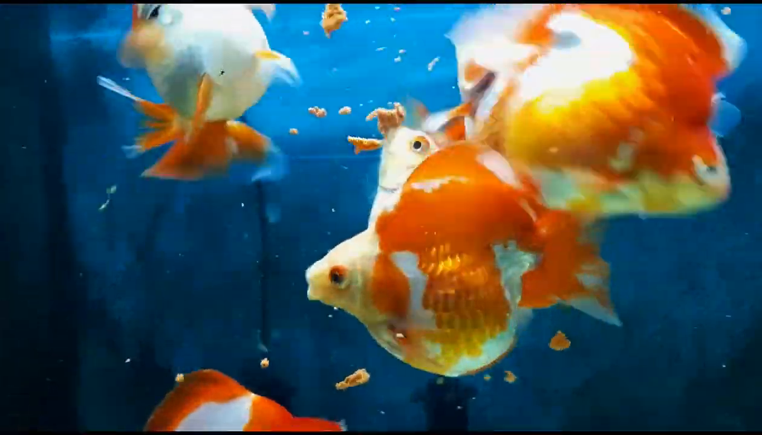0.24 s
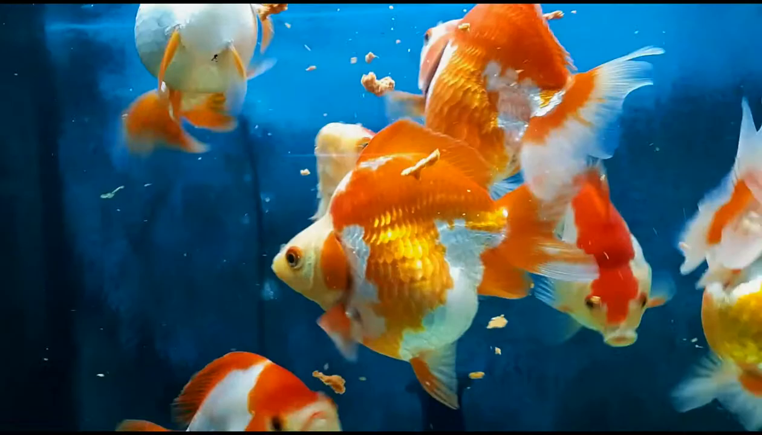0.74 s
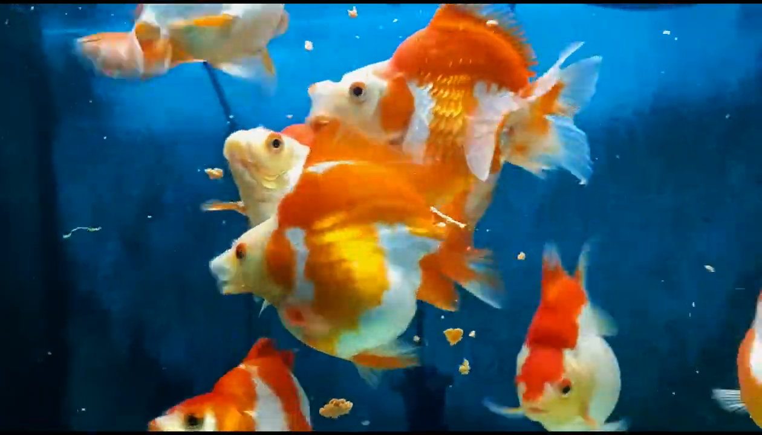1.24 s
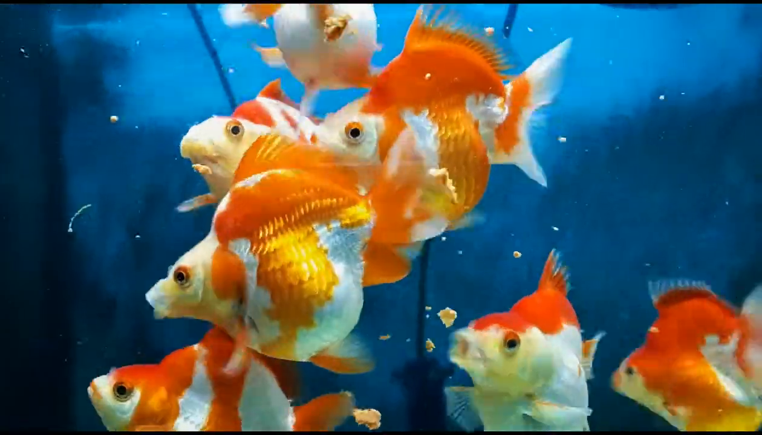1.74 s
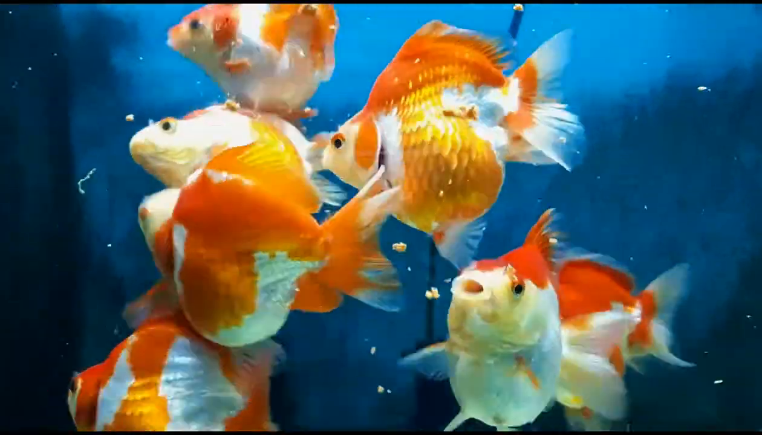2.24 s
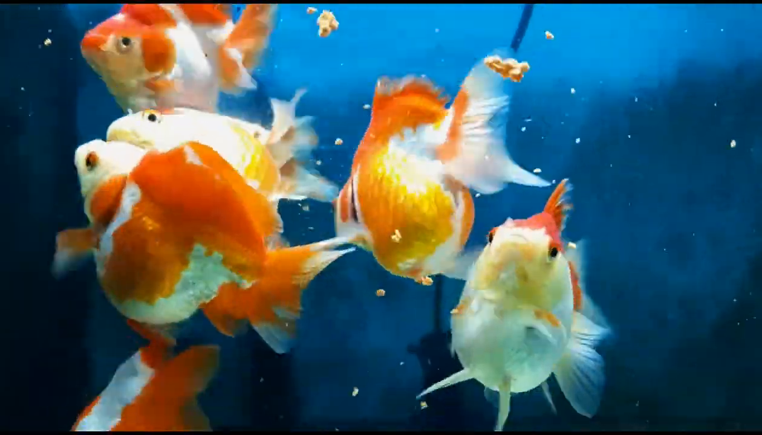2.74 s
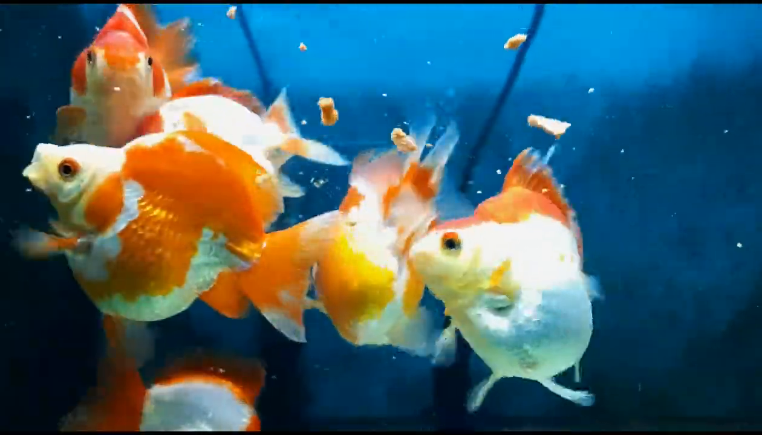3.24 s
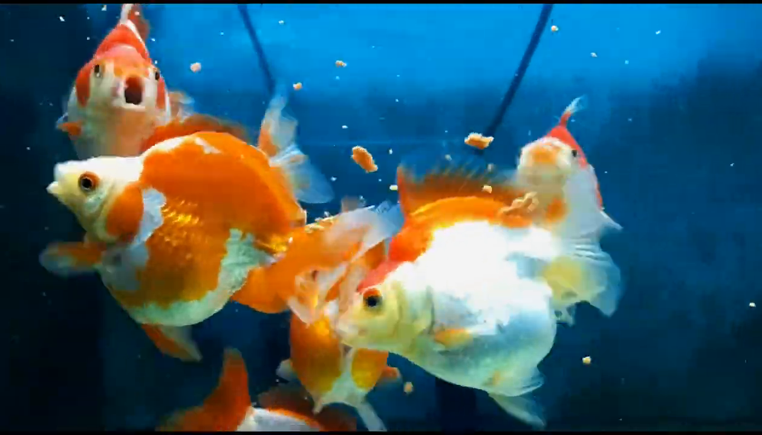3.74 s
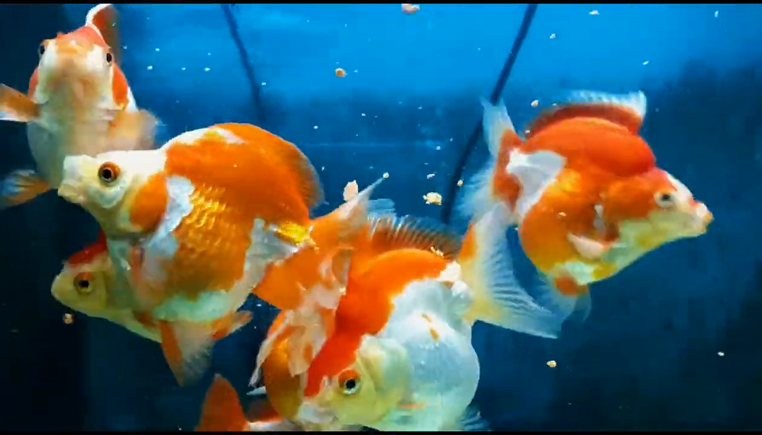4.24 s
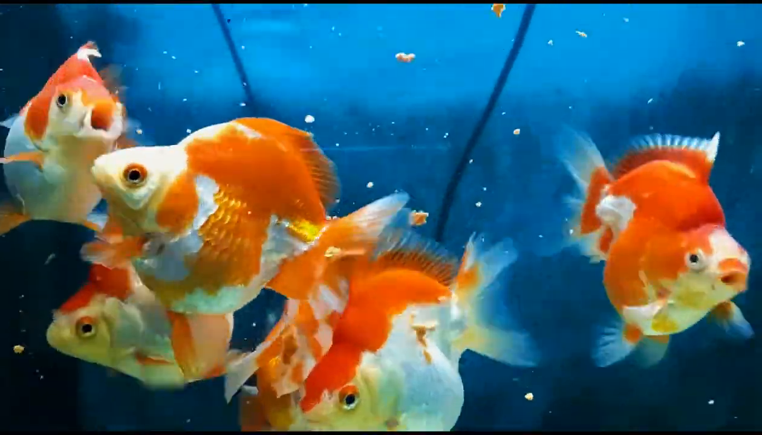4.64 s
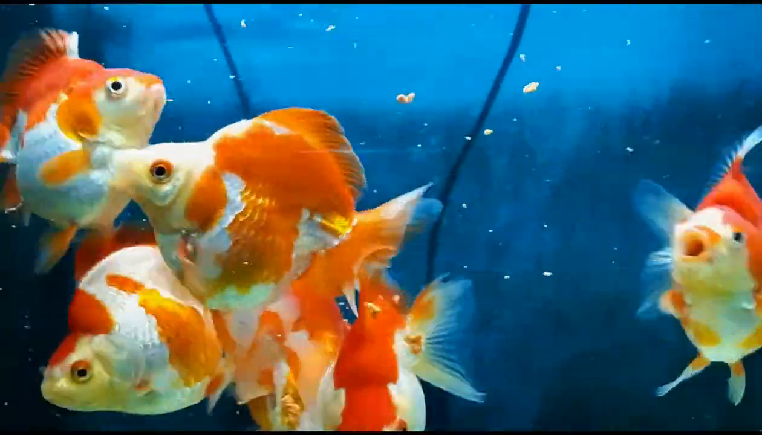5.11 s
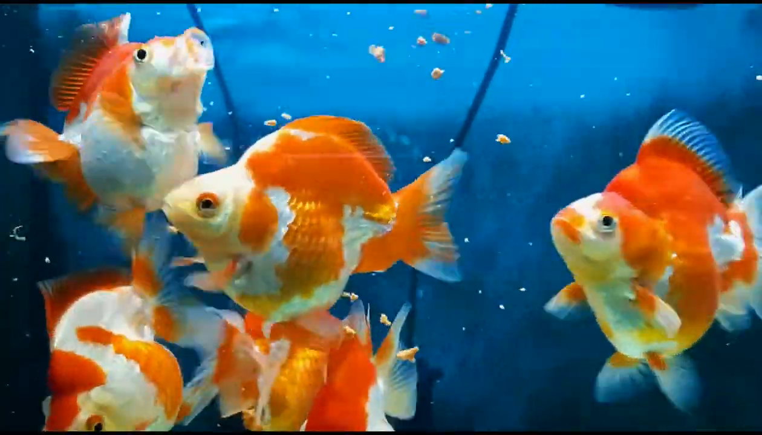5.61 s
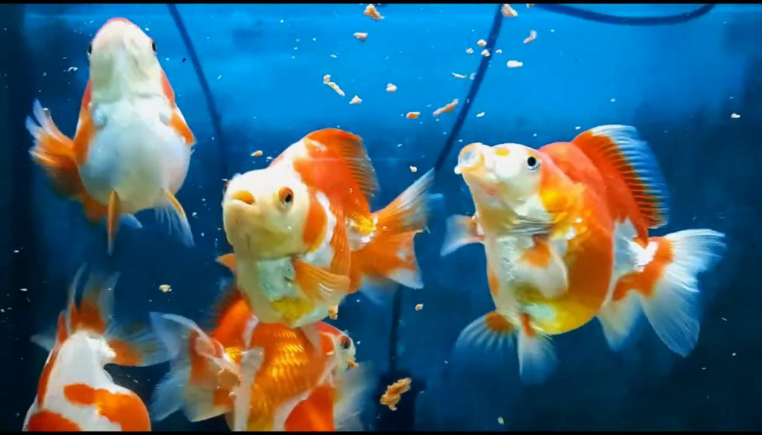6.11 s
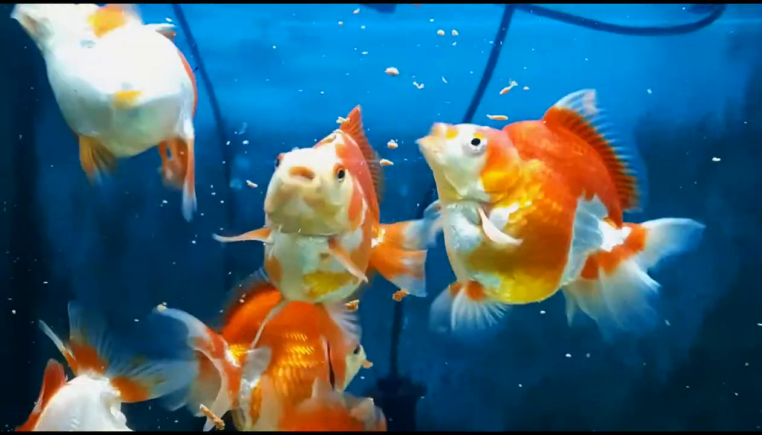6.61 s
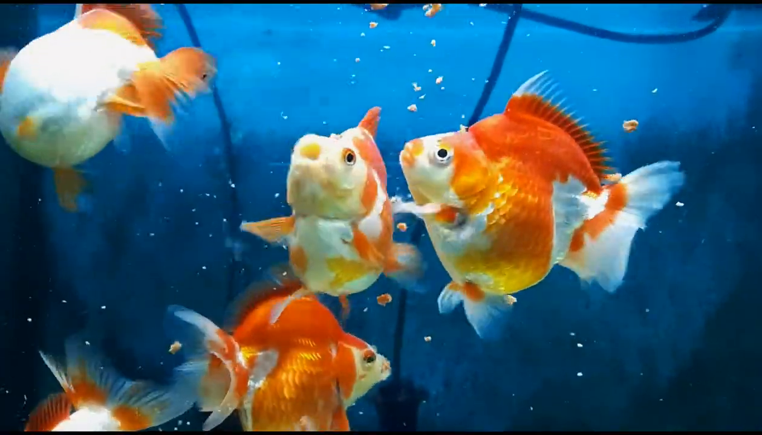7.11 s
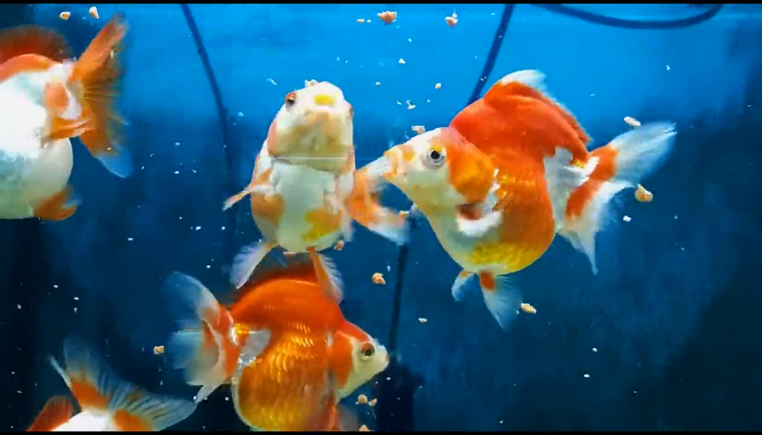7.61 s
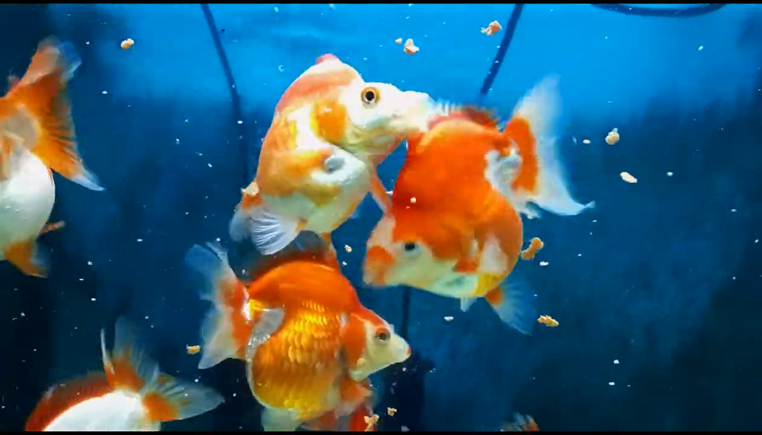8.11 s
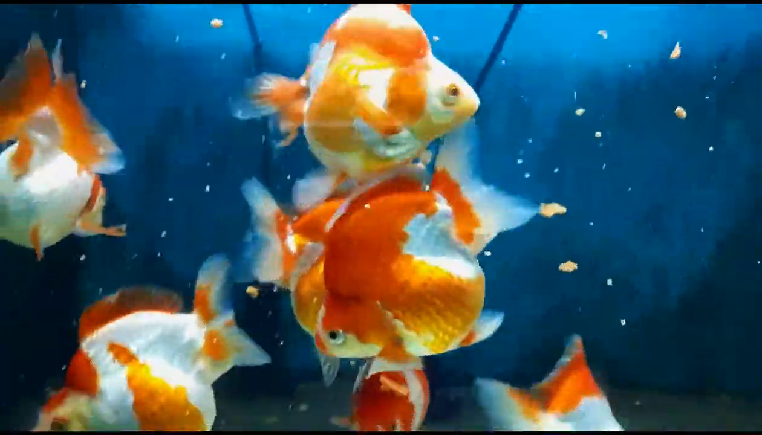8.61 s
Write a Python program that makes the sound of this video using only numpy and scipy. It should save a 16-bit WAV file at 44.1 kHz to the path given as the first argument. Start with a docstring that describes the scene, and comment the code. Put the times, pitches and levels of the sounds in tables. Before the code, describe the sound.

Indoors, close to a goldfish tank, an air pump buzzes low and steady while filter water washes and bubbles. Small bubbles ping, with a cluster of louder plops and light clicks just before the middle. Then a sudden, very loud hard knock clatters and rings briefly; the background drops for about a second and creeps back. Later comes a soft booming bump, then a splashy swish with plops near the end.

```python
"""An aquarium's air pump buzzes at mains frequency in a small room, as harmonics that waver.
The filter outflow is shaped noise that washes and flickers; chirping sines make its bubbles.
A sharp knock of something hard is bursts of noise and ringing modes; around it come a few
light clicks, and later a soft bump that booms. The knock makes the recorder's gain control
duck everything for about a second."""
import sys
import numpy as np
from scipy import signal
from scipy.fft import rfft, irfft, next_fast_len
from scipy.io import wavfile
from scipy.ndimage import uniform_filter1d, minimum_filter1d

SR = 44100
rng = np.random.default_rng(int(sys.argv[2]) if len(sys.argv) > 2 else 0)


def unload_audio(sound):
    """Save the sound as a 16-bit wav file, at the path given as the first command line argument."""
    columns = np.transpose(np.atleast_2d(sound))
    # keep every value between -1 and 1, then stretch to whole-number steps
    steps = np.round(np.clip(columns, -1, 1) * 32767)
    wavfile.write(sys.argv[1], SR, steps.astype(np.int16))


N = 390726
TIME = np.arange(N) / SR


def from_db(db):
    """Decibels to gain."""
    return 10 ** (np.asarray(db) / 20)


def rms_one(x):
    """Scale to rms 1."""
    return x / np.sqrt(np.mean(x ** 2) + 1e-20)


def bins(size):
    """Frequencies of a real spectrum in Hz, kept above zero."""
    return np.maximum(np.arange(size // 2 + 1) * SR / size, 1)


def at_hz(points, hz):
    """Read a table on a log-frequency axis."""
    table = np.array(points)
    return np.interp(np.log(hz), np.log(table[:, 0]), table[:, 1])


def drift(rate_hz, step_samples=64):
    """Slow chance with spread 1: noise on a coarse time grid, rolled off above rate_hz."""
    size = 2 * (N // step_samples // 2 + 2)
    rolloff = 1 + (bins(size) / step_samples / rate_hz) ** 2
    slow = irfft(rfft(rng.standard_normal(size)) / rolloff, size)
    return np.interp(np.arange(N) / step_samples, np.arange(size), rms_one(slow))


def room_noise(gain, size):
    """Diffuse noise of a given spectrum: much alike at both microphones in the bass, little in the treble."""
    # likeness of the two microphones; it swings where sound from one side meets them out of step
    # columns: frequency_hz, coherence [-1 to 1]
    likeness = [(50, 0.84), (120, 0.95), (270, 0.96), (450, 0.89), (720, 0.2), (1000, 0.086), (1250, 0.11),
                (1500, -0.33), (1850, -0.28), (2350, 0.26), (3300, -0.04), (15000, 0.0094)]
    alike = np.clip(at_hz(likeness, bins(size)), -.99, .99)
    mid, side = rfft(rng.standard_normal((2, size)))
    common = np.sqrt((1 + alike) / 2) * mid
    opposed = np.sqrt((1 - alike) / 2) * side * [[1], [-1]]
    return irfft(gain * (common + opposed), size)


def dying(t60_s):
    """One second of exponential decay, falling 60 dB in t60_s."""
    return np.exp(-np.log(1000) * TIME[:SR] / t60_s)


def swelling(rise_s):
    """One second of exponential approach to full level."""
    return 1 - np.exp(-TIME[:SR] / rise_s)


def add(out, start_s, sound):
    """Mix a sound in at a given time."""
    start = max(round(start_s * SR), 0)
    out[:, start:start + sound.shape[1]] += sound[:, :N - start]


def burst(level_db, centre_hz, octaves, rise_s=0.004, t60_s=0.21):
    """One resonance excited briefly: a band of noise that swells and dies away with the room."""
    distance = np.log2(bins(SR) / centre_hz) / octaves
    band = rms_one(room_noise(np.exp(-.5 * distance ** 2), SR))
    swell = dying(t60_s) * swelling(rise_s)
    return from_db(level_db) * band * swell / swell.max()


def pump(waver_db=0.4, mains_hz=60.022):
    """The diaphragm beats with the mains; changing back pressure makes each harmonic waver."""
    # pump harmonics in the room's standing waves, levels as rms before the waver
    # columns: multiple [of mains], left_db, right_db, left_lead_rad
    harmonics = [(1, -64, -66, -0.6), (2, -57.5, -58, 0), (3, -52.5, -51.5, -0.2), (4, -65, -63, 0),
                 (5, -55, -53, 0), (6, -61, -62, 0.5), (7, -43, -43, -0.4), (8, -57, -56, 0.3),
                 (9, -66, -71, 0.5), (10, -58, -50, 0.3), (11, -55, -46, 0.2), (13, -58, -51, 0.8),
                 (14, -66, -50, -0.5), (16, -67, -65, 2.6), (17, -62, -76, 3), (18, -66, -62, -1.9),
                 (19, -68, -67, 0.4), (21, -67, -61, 0.4), (22, -61, -63, 0.2), (23, -66, -66, -3),
                 (30, -66, -81, 3.1)]
    out = np.zeros((2, N))
    wavers = [from_db(waver_db * drift(1.9)) for _ in range(4)]  # shared among the harmonics
    for k, (multiple, left_db, right_db, lead_rad) in enumerate(harmonics):
        phase = 2 * np.pi * (multiple * mains_hz * TIME + rng.random())
        tone = np.sin([phase + lead_rad, phase])
        out += from_db([[left_db], [right_db]]) * tone * wavers[k % len(wavers)]
    return np.sqrt(2) * out  # sine peak from rms


def outflow(flow_db=-0.34, spray_db=-0.26, surge_db=0.5, spatter_db=1.34, spatter_hz=5940.0):
    """A wash of water, coloured by the tank's resonances; its spray grows and flickers with the flow."""
    # water wash, stirred by the outflow; columns: frequency_hz, density_db [per Hz, before flow_db]
    wash = [(48, -100), (70, -77), (88, -92.5), (125, -76.5), (220, -72), (340, -73), (530, -69.8),
            (640, -75), (730, -71.5), (900, -74), (2400, -77), (3000, -84.5), (3700, -90.5), (6800, -91),
            (7700, -96.5), (11500, -96.5), (15000, -99.4)]
    # resonances of tank and cabinet that the flow keeps ringing
    # columns: centre_hz, width_hz, level_db [rms, before flow_db]
    resonances = [(73, 2.5, -69.5), (109.7, 7, -67), (156.6, 3.4, -58.5), (278, 19, -55.5),
                  (391.4, 9, -52.5), (415, 32, -53.5), (722, 47, -54.5), (1320, 18, -60), (1776, 40, -57),
                  (2340, 27, -59)]
    # where the wash sits between the microphones; columns: frequency_hz, left_minus_right_db
    balance = [(200, -1), (430, -3.5), (650, -4.5), (900, 0), (1250, -0.6), (1800, 4.5), (2500, 1),
               (3200, -1.8), (12000, -0.5), (15000, -4)]
    size = next_fast_len(N)
    hz = bins(size)
    power = from_db(at_hz(wash, hz)) ** 2
    for centre_hz, width_hz, level_db in resonances:
        peak = 1 / (1 + ((hz - centre_hz) / width_hz) ** 2) ** 2
        power = power + from_db(level_db) ** 2 * peak / (np.pi / 2 * width_hz)
    gain = np.sqrt(power * SR / 2) * from_db(at_hz(balance, hz) * [[.5], [-.5]])
    # the spray is the part of the wash above spatter_hz
    low_share = 1 / (1 + (hz / spatter_hz) ** 4)
    body = room_noise(gain * np.sqrt(low_share), size)[:, :N]
    spray = room_noise(gain * np.sqrt(1 - low_share), size)[:, :N]
    surge = surge_db * drift(8.9)
    flicker = from_db(spray_db + surge + spatter_db * drift(15.0))
    return from_db(flow_db + surge) * (body + spray * flicker)


def bubbles():
    """Steady bubbling at the surface, stray drips, and trickles of tiny bubbles of nearly one size."""
    # bubbles bursting at the surface; columns: low_hz, high_hz, rate_per_s, level_db [rms]
    steady = [(450, 2570, 500, -57), (2940, 12300, 300, -67.5)]
    # a fine trickle of tiny bubbles swells and fades twice; columns: height_s, level_db, pitch_hz
    trickles = [(3.58, -59.5, 4800), (7.28, -59.5, 5250)]
    swell_s, pitch_spread = 0.28, 0.205  # Gaussian width in s; share of the pitch to either side
    out = np.zeros((2, N))
    for low_hz, high_hz, per_s, level_db in steady:
        out += from_db(level_db) * bubble_cloud(low_hz, high_hz, per_s)
    drips = bubble_cloud(3380, 5640, per_s=13, cycles=55.0, spread_db=-1.0, glide=.02)
    out += from_db(-66.5) * drips
    for height_s, level_db, pitch_hz in trickles:
        low_hz, high_hz = pitch_hz * (1 - pitch_spread), pitch_hz * (1 + pitch_spread)
        trickle = bubble_cloud(low_hz, high_hz, per_s=130, cycles=32.0, spread_db=2.5, glide=.02)
        swell = np.exp(-.5 * ((TIME - height_s) / swell_s) ** 2)
        out += from_db(level_db) * swell * trickle
    return out


def bubble_cloud(low_hz, high_hz, per_s, cycles=29.0, spread_db=4.0, glide=0.11, room_t60_s=0.29,
                 direct=0.36):
    """Each bubble rings for some cycles, rising in pitch; walls add their echo to the direct sound."""
    walls = room_noise(1, SR) * dying(room_t60_s)
    walls /= np.sqrt(np.sum(walls ** 2) / 2)
    pings = np.zeros((1, N))
    for when, pitch, chance in rng.random((int(per_s * N / SR), 3)):
        length = cycles * SR / (low_hz * (high_hz / low_hz) ** pitch)
        age = np.arange(int(length)) / length  # 0 to 1 over the bubble's life
        size = from_db(spread_db * min(-np.log(1 - chance), 4))
        ping = np.sin(2 * np.pi * cycles * age * (1 + glide * age)) * np.exp(-np.log(100) * age)
        add(pings, when * TIME[-1], size * ping[None])
    echo = signal.oaconvolve(pings, walls[:, :SR // 2], axes=1)[:, :N]
    return rms_one(direct * pings + echo)


def surface():
    """Single sounds of the water's surface: rising bubbles, ticks of spray and a swish."""
    # single bubbles ping and plop; columns: start_s, level_db, pitch_hz, left_minus_right_db
    pings = [(.086, -42, 5300, -5), (.249, -43, 5030, -4), (.412, -45, 2820, 0), (.592, -41.5, 3290, -1),
             (.850, -50, 5100, 0), (1.634, -48, 4980, 2), (1.852, -47.5, 5080, -2), (2.42, -49, 4100, 0),
             (3.335, -42.5, 3200, -2), (3.44, -51, 4680, -2), (3.495, -47, 4650, 0), (3.535, -49, 3850, 0),
             (3.555, -48, 5200, -2), (4.148, -52, 4600, 0), (4.275, -38, 1287, 0), (4.279, -39, 2650, 0),
             (4.346, -38.5, 2500, 0), (4.365, -35, 2720, 2), (4.364, -41, 3450, 0), (4.398, -27.5, 1970, 2),
             (4.417, -24, 2250, 3), (7.095, -47, 5350, 0), (7.135, -46, 5350, 0), (7.34, -45, 5550, 0),
             (8.428, -48, 4030, 0), (8.438, -35, 1660, 2), (8.475, -40, 2270, 4), (8.508, -32, 2290, 5),
             (8.530, -29.5, 2270, 6), (8.636, -48, 4130, 1), (8.658, -44, 4130, 1)]
    # fine spray ticks; columns: start_s, level_db
    ticks = [(.494, -54), (2.143, -54), (3.077, -54), (3.645, -57), (3.845, -54)]
    out = np.zeros((2, N))
    for start_s, level_db, pitch_hz, pan_db in pings:
        add(out, start_s, pop(level_db, pitch_hz, pan_db))
    for start_s, level_db in ticks:
        add(out, start_s, burst(level_db, centre_hz=11100, octaves=0.2))
    swish = burst(-41.5, centre_hz=1660, octaves=0.61, rise_s=0.032, t60_s=0.4)
    add(out, 8.472, swish)
    return out


def pop(level_db, pitch_hz, pan_db, swell_s=.002, climb_per_s=13, direct_share=.14):
    """One bubble chirps upward as it opens, by a share of its pitch per second; the walls blur it."""
    age = TIME[:SR // 2]
    swell = age / swell_s * np.exp(1 - age / swell_s)
    climbing = age + climb_per_s * (age - swell_s) ** 2 / 2  # at pitch_hz when the swell peaks
    ring = (swell * np.sin(2 * np.pi * pitch_hz * climbing))[None]
    walls = room_noise(1, SR) * dying(.16) * swelling(.005)
    echo = signal.fftconvolve(ring, walls[:, :len(age)], axes=1)[:, :len(age)]
    heard = np.sqrt(direct_share) * rms_one(ring) + np.sqrt(1 - direct_share) * rms_one(echo)
    heard = heard * ring.std() / heard.std(axis=1, keepdims=True)
    return from_db(level_db + pan_db * np.array([[.5], [-.5]])) * heard


def knock(clatter_db=-14.5, ring_db=-16.0, ring_rise_s=0.013, crack_t60_s=0.018, body_t60_s=0.19,
          treble_t60_s=0.14, low_rise_s=0.0085, tail_db=-23.5, tail_t60_s=0.62):
    """A hard thing lands and rattles to rest: cracks, dense clatter, ringing modes and the room's tail."""
    # contacts of the knock; columns: start_s, clatter_db [relative to clatter_db above], crack_db
    contacts = [(4.938, -1, -15), (4.9398, -8, -10), (4.9486, -2.5, -17), (4.9557, -6, -18),
                (4.9700, -5.5, -26), (4.9906, -15, -29), (5.023, -22, -36)]
    # spectrum of the clatter; columns: frequency_hz, density_db [relative, per Hz]
    clatter_spectrum = [(30, -32), (70, -22), (250, -14), (650, -14.5), (950, -9), (1250, -7), (1460, -5),
                        (1640, -5), (1850, -8), (2120, -9), (2400, -2), (2900, -0.5), (3450, -3),
                        (3750, -4.5), (4000, -1), (4300, 1), (4900, -8), (5300, -4.5), (6200, -9),
                        (6900, -4), (7300, -14), (9000, -14.5), (10800, -19), (12000, -25), (12550, -20),
                        (13200, -33), (14100, -24), (15000, -42)]
    # spectrum of each contact's short crack; columns: frequency_hz, density_db [relative, per Hz]
    crack_spectrum = [(300, -36), (1400, -16), (2600, -5), (4050, 2), (5100, -5), (7000, 1), (9400, -13),
                      (12500, -17), (13200, -25), (14000, -9), (15000, -30)]
    # modes of the knocked thing; columns: pitch_hz, level_db [relative to ring_db], t60_s
    modes = [(910, -14.5, .16), (1148, -7.5, .2), (1304, 0, 0.24), (1420, -13, .18), (1635, -5, 0.18),
             (1840, -11, 0.32), (1974, -13, 0.27), (2288, -8, .18), (2390, 2.5, .17), (2640, -2, .14),
             (2750, -3, .16), (2890, -6, .24), (2940, 1, .14), (3060, -2, 0.24), (3230, -6, .2),
             (3483, -0.5, 0.18), (3920, -3, .17), (4168, 2, .16), (4280, 4, .12), (4320, 0, .13),
             (4650, -3, .2), (4931, -12, .2), (5300, -5, .18), (5848, -5, .19), (6724, -2, .12),
             (6900, -8, .16), (7020, -4, .17), (7900, -12, .14), (8514, -9, .14), (9400, -15, .14),
             (10192, -12, .14), (10872, -16, .14), (13959, -14, .12)]
    out, hz, age = np.zeros((2, N)), bins(SR), TIME[:SR]
    treble, bass = 1 / (1 + (6500 / hz) ** 4), 1 / (1 + (hz / 1600) ** 6)
    clatter_gain = from_db(at_hz(clatter_spectrum, hz))
    crack_gain = from_db(at_hz(crack_spectrum, hz))
    for start_s, level_db, crack_db in contacts:
        dense = rms_one(room_noise(clatter_gain, SR))
        bright, low = (irfft(rfft(dense) * share, SR) for share in (treble, bass))
        # the lows start late, the treble dies sooner than the body; the room outlasts both
        body = dense - bright - low * np.exp(-age / low_rise_s)
        clatter = body * dying(body_t60_s) + bright * dying(treble_t60_s)
        clatter += dense * from_db(tail_db) * dying(tail_t60_s)
        # early reflections make the clatter ragged
        ragged = from_db(2.2 * drift(200, step_samples=16)[:SR])
        add(out, start_s, from_db(level_db + clatter_db) * clatter * ragged)
        crack = rms_one(room_noise(crack_gain, SR)) * dying(crack_t60_s)
        add(out, start_s, from_db(crack_db) * crack)
    # the modes build up over the bounces and reach the two microphones out of step
    out_of_step = np.array([[0], [np.pi / 2]])
    for pitch_hz, level_db, t60_s in modes:
        start_s, rise_s = contacts[0][0], ring_rise_s
        if pitch_hz < 1500:  # the low modes wake only when the full weight lands
            start_s, rise_s = 4.9475, 0.0024
        phase = 2 * np.pi * (pitch_hz * age + rng.random()) + out_of_step * rng.choice([-1, 1])
        ring = dying(t60_s) * np.sin(phase) * swelling(rise_s)
        add(out, start_s, from_db(ring_db + level_db) * ring)
    return out * from_db([[-0.7], [0.7]])  # a little to the right


def clicks():
    """Light grainy contacts, each with a body and a treble resonance, and one thin, very high ring."""
    # light clicks and splashes around the tank
    # columns: start_s, body_db, body_hz, treble_db, treble_hz, width_octaves
    contacts = [(3.148, -48, 3650, -53, 5500, .25), (4.268, -42, 3380, -50, 7500, 0.17),
                (4.432, -47.5, 3650, -46.5, 6600, 0.36), (4.545, -51, 3800, -49.5, 7300, 0.3),
                (4.562, -54, 4700, -55, 8850, 0.16), (8.480, -52, 3900, -58, 5200, .2),
                (8.547, -54, 3900, -55, 5200, .2)]
    out = np.zeros((2, N))
    for start_s, body_db, body_hz, treble_db, treble_hz, octaves in contacts:
        # splashes break up into grains
        grain = from_db(2.4 * drift(260, step_samples=16)[:SR])
        contact = burst(body_db, body_hz, octaves) + burst(treble_db, treble_hz, octaves)
        add(out, start_s, contact * rms_one(grain))
    add(out, 6.25, burst(-50, centre_hz=12850, octaves=.004, t60_s=0.44))
    return out


def bump(rise_s=0.023):
    """A dull touch, then a soft bump and its rebound set the cabinet booming."""
    # low modes of the cabinet; columns: pitch_hz, level_db [before the bump's own level], t60_s
    cabinet_modes = [(74.4, -42, 0.66), (111.5, -29.5, 0.29)]
    # a soft bump and its rebound; columns: start_s, level_db [relative]
    landings = [(6.815, -2.5), (6.92, -7)]
    out = np.zeros((2, N))
    add(out, 6.765, burst(-44, centre_hz=167, octaves=0.3))  # the touch
    boom = np.zeros(SR)
    for pitch_hz, level_db, t60_s in cabinet_modes:
        boom += from_db(level_db) * dying(t60_s) * np.sin(2 * np.pi * pitch_hz * TIME[:SR])
    for start_s, level_db in landings:
        add(out, start_s, (from_db(level_db) * boom * swelling(rise_s))[None])
        rumble = burst(level_db - 47, centre_hz=75, octaves=.7, rise_s=rise_s, t60_s=.6)
        add(out, start_s, rumble)
    return out


def scene():
    """Pump, water and the small events around the tank."""
    return pump() + outflow() + bubbles() + surface() + knock() + clicks() + bump()


def gain_control(x, threshold_db=-21.5, depth_db=9.0, hold_s=1.04, attack_s=0.23, release_s=0.24):
    """A loud sound pulls the gain down; it is held, then creeps back."""
    power = uniform_filter1d(np.mean(x ** 2, axis=0), size=441)  # over 10 ms
    level_db = 10 * np.log10(np.maximum(power, 1e-12))
    wanted_db = -np.clip(level_db - threshold_db, 0, depth_db)
    hold = int(hold_s * SR / 2) * 2 + 1
    # the origin makes the hold look back only
    held_db = minimum_filter1d(wanted_db, hold, origin=hold // 2, mode="constant")
    keep = np.exp(-1 / (SR * np.array([attack_s, release_s])))
    fast, slow = (signal.lfilter([1 - k], [1, -k], held_db) for k in keep)
    return x * from_db(np.minimum(fast, slow))


def record(dry):
    """The recorder: gain control, rounded peaks, and the top is cut above 15.6 kHz."""
    rounded = 1.6 * np.tanh(gain_control(dry) / 1.6)
    top_cut = signal.ellip(10, .1, 80, 15600, fs=SR, output="sos")
    return signal.sosfilt(top_cut, rounded)


dry = scene()
out = record(dry)
unload_audio(out)
```